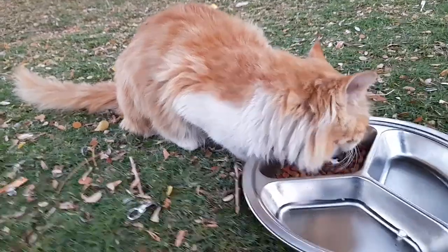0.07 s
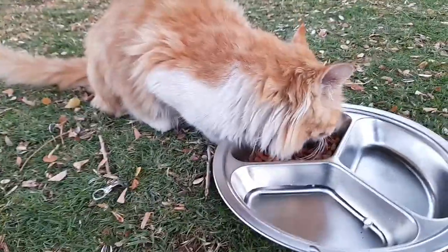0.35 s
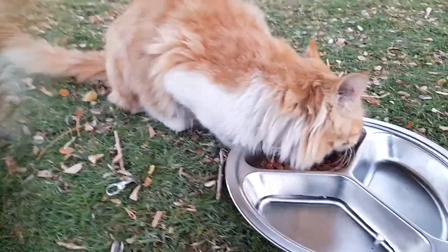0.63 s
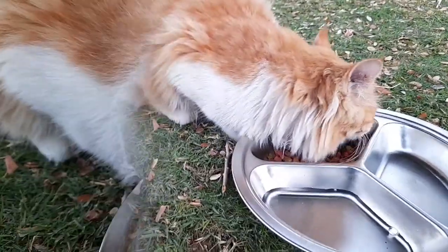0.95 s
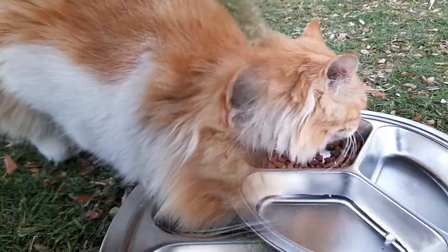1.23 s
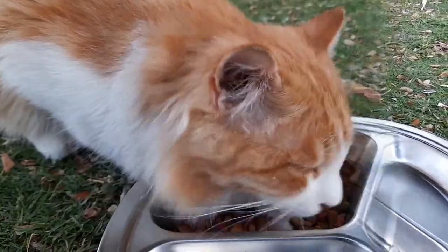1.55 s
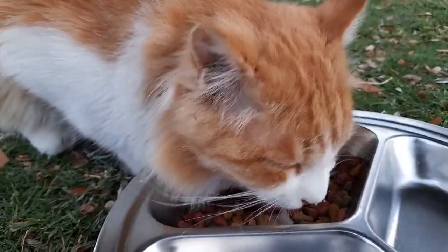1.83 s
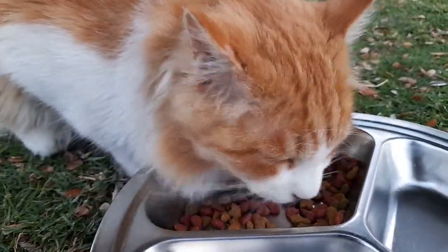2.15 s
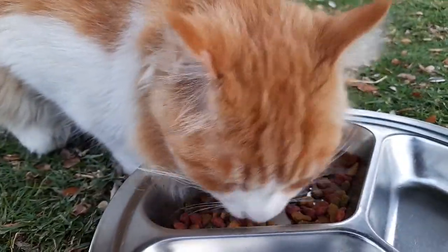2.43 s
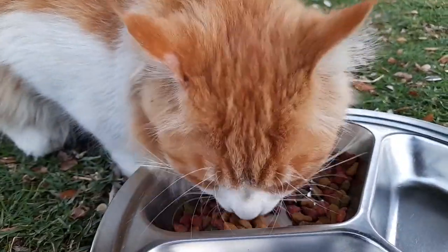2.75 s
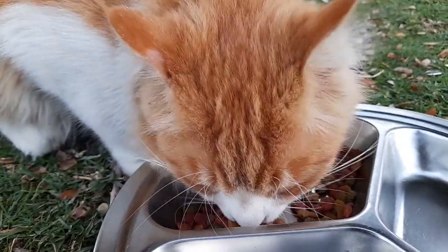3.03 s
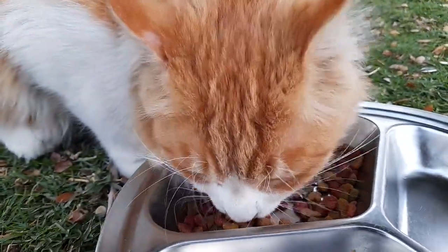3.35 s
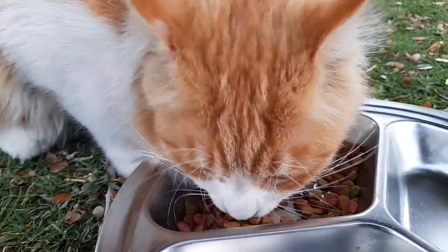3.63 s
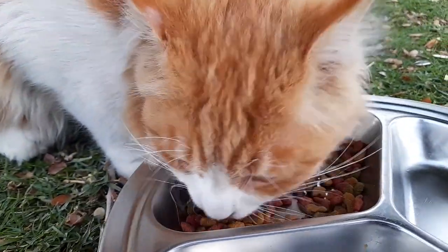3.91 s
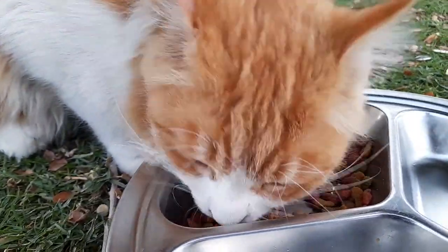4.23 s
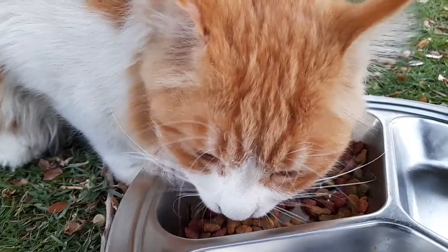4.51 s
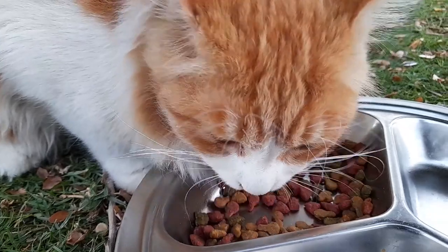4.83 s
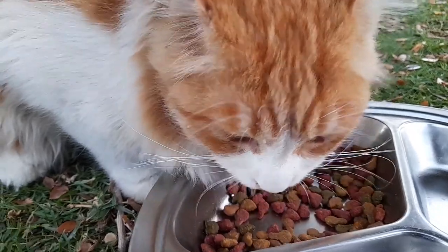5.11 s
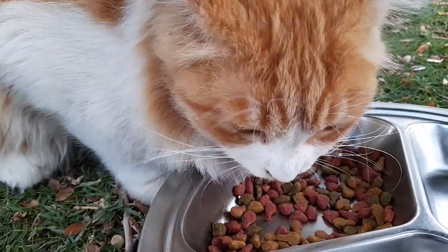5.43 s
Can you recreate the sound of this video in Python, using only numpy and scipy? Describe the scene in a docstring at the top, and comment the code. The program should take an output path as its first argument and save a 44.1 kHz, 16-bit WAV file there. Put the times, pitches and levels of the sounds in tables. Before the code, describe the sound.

Crisp crunches and light metallic clinks sound close to the microphone as a cat eats dry food from a steel tray outdoors. The opening rumble of far traffic, engine hum and grass hiss drops, and the eating turns sparse. Then the pellets rattle against the metal again, with a few soft bumps, before giving way to tiny wet licks and quiet chewing.

```python
"""A cat eats dry food from a steel tray on a lawn, heard from close above.
Over far traffic and an engine drone, its muzzle shoves pellets against the ringing steel and they
crack between its teeth. The louder opening background cross-fades into a quieter one by 1.6 s.
From 3.1 s a second bout of shoving rattles the tray and grinds the heap, with soft low thuds.
After 4.4 s the clinks give way to wet squeaks of the tongue and a few last quiet bites."""
import sys
import numpy as np
from scipy import signal
from scipy.fft import rfft, irfft
from scipy.io import wavfile
from scipy.ndimage import uniform_filter1d

SR = 44100
rng = np.random.default_rng(int(sys.argv[2]) if len(sys.argv) > 2 else 0)


def digitize_waveform(pressure):
    """Quantize a signal to 16-bit integers and store it at the path in sys.argv[1].

    Rows of a 2-D input are taken as channels; values are limited to [-1, 1].
    """
    field = np.atleast_2d(pressure).T
    bounded = np.clip(field, -1, 1)
    quanta = np.round(bounded * 32767).astype(np.int16)
    wavfile.write(sys.argv[1], SR, quanta)


N = 245544
TIME = np.arange(N) / SR

# pellets shoved against the tray: (time [s], relative body [dB], relative treble [dB], rattle time [s])
CLINKS = [(0.33, -44, -51, 0.0039), (0.4470, -38, -56, .008), (0.4694, -37.5, -47.5, 0.009),
          (0.524, -39.5, -46.5, .01), (0.7240, -41, -53, 0.012), (0.7620, -43, -53, 0.012),
          (0.865, -39.5, -58, 0.0057), (0.8876, -37.5, -42.5, 0.0053), (0.9290, -42.5, -57, 0.0075),
          (1.008, -41, -40.5, 0.0036), (1.0258, -39.5, -43, .012), (1.1561, -38.5, -44.5, 0.0039),
          (1.206, -46, -60, .01), (1.2890, -35.5, -49, 0.0068), (1.3, -44.5, -37.5, .009),
          (1.347, -43.5, -57, .008), (1.3662, -41.5, -44, 0.005), (1.442, -52, -58, .005),
          (2.556, -50, -72, 0.012), (2.663, -46, -65, 0.0096), (3.1193, -40, -50, 0.0042),
          (3.163, -40.5, -52, .01), (3.186, -42, -42.5, 0.0036), (3.247, -36.5, -45.5, 0.0084),
          (3.287, -38, -57, 0.003), (3.419, -46.5, -51.5, 0.016), (3.6547, -31.5, -43, .004),
          (3.7360, -41, -54, 0.0085), (3.7564, -34, -34, 0.011), (3.7973, -37.5, -42, 0.0091),
          (3.8219, -33.5, -37, 0.006), (3.926, -52, -59, .004), (3.9563, -45, -48.5, 0.0041),
          (4.0015, -41, -54, 0.012), (4.0340, -64, -57.5, 0.0077), (4.1370, -42.5, -53.5, 0.0066),
          (4.1591, -40.5, -43, 0.006), (4.231, -38.5, -44.5, 0.022), (4.275, -41.5, -48, 0.016),
          (4.301, -51, -56, 0.003), (4.3450, -35.5, -42, 0.0082)]
# pellets bitten through: (time [s], relative snap [dB], fragment pitch [Hz], mouth cavity level [dB])
CRACKS = [(0.0782, -33, 5900, -49), (0.3326, -35, 3870, -38), (0.3464, -34, 5300, -53),
          (0.4752, -31.5, 5170, -42), (0.6388, -36.5, 3770, -56), (0.8283, -19, 5980, -36),
          (1.0937, -30, 4220, -37.5), (1.1215, -35, 5300, -44), (2.0277, -43.5, 4580, -48),
          (3.29, -54, 5040, -35), (3.31, -41.5, 4300, -39.5), (4.155, -39, 6500, -39.5),
          (4.2245, -50, 4500, -41), (5.0998, -49.5, 5640, -62), (5.308, -42, 5400, -60),
          (5.4107, -49, 4940, -34), (5.4754, -53, 6400, -35), (5.5514, -48.5, 6000, -37.5)]


def tray(size=9000, body_db=-7, treble_db=2, tick_db=6, tick_s=0.0018, split_hz=7500, detune_hz=14):
    """Pellets rattle on the steel; every spot that they hit weights its modes differently."""
    run_up, hit_delay_s = 2600, .0035  # run-up: samples of scraping before the hit
    hz, t60, strength = steel_modes()
    spot = rng.standard_normal((len(CLINKS), 3, len(hz), 2)) @ np.array([1, 1j]) * strength
    # each channel hears its own mix of modes, plus a part common to both
    weights = (spot[:, :2] + 0.52 * spot[:, 2:]).reshape(-1, len(hz))
    # the contact itself is a dry tick on top of the ring
    modes = ring(hz, t60, size) * (1 + undb(tick_db) * np.exp(-TIME[:size] / tick_s))
    low_share = 1 / (1 + (hz / split_hz) ** 10)
    # the shifting load of food detunes the steel from knock to knock
    detune = np.exp(2j * np.pi * detune_hz * rng.standard_normal((len(CLINKS), 1, 1)) * TIME[:size])
    bodies = (((weights * low_share) @ modes).reshape(-1, 2, size) * detune).real
    trebles = (((weights * (1 - low_share)) @ modes).reshape(-1, 2, size) * detune).real
    mean_bright_db = np.mean([high_db - low_db for _, low_db, high_db, _ in CLINKS])
    out = np.zeros((2, N))
    for (s, low_db, high_db, rattle_s), body, treble in zip(CLINKS, bodies, trebles):
        hardness_db = 0.45 * (high_db - low_db - mean_bright_db)  # bright hits are the hard ones
        push = shove(run_up, rattle_s, hardness_db)
        body = peak_to(signal.fftconvolve(body, push, axes=1), low_db + body_db, size=180)
        treble = peak_to(signal.fftconvolve(treble, push, axes=1), high_db + treble_db, size=180)
        add(out, body + treble, s + hit_delay_s - run_up / SR)
    return out


def steel_modes(count=520, low_t60=0.21, high_t60=0.084, long_t60=.24, shimmer_db=-12):
    """Pitch, decay and gain of the tray's modes: a crowd damped by food and grass, some that ring on."""
    # long-ringing modes: (frequency [Hz], relative level [dB])
    ringing_modes = [(1632, 2), (2700, 6), (3273, 13.5), (5250, 5), (6546, 7), (10710, -3)]
    # colour of the damped crowd: (frequency [Hz], relative level [dB])
    crowd_colour = [(600, 7), (1100, 4.5), (1550, 9), (2150, 4.5), (2650, 10.5), (3500, 2), (4400, 5.5),
                    (6500, 2), (8500, -6), (12500, 0.5), (16000, -8.5)]
    crowd_hz = np.linspace(650, 16000, count) + rng.uniform(-60, 60, count)
    crowd_t60 = np.linspace(low_t60, high_t60, count)
    crowd_gain = colour_at(crowd_colour, crowd_hz)
    # every fourth escapes the damping: a weak, longer shimmer
    crowd_t60[::4] = long_t60
    crowd_gain[::4] *= undb(shimmer_db)
    mode_hz, mode_db = np.transpose(ringing_modes)
    mode_t60 = np.full(len(mode_hz), long_t60)
    return np.r_[crowd_hz, mode_hz], np.r_[crowd_t60, mode_t60], np.r_[crowd_gain, undb(mode_db)]


def shove(run_up, rattle_s, hardness_db, scrape_db=-26, rattle_db=-6.5):
    """Fine scraping builds up to the hit and pellets rattle on; a hard hit stands clear of both."""
    scrape = contacts(.016, follow_db=0, count=45)[:, run_up:0:-1]
    hit = contacts(rattle_s, follow_db=rattle_db - hardness_db, count=10)
    return np.c_[undb(scrape_db - hardness_db) * scrape, hit]


def contacts(mean_delay_s, follow_db, count):
    """A first sharp contact and a scatter of further ones that dies away."""
    push = np.zeros(4096)
    delay = rng.exponential(1, count)
    force = undb(follow_db) * rng.standard_normal(count) * np.exp(-delay / 2)
    onsets = np.minimum(delay * max(mean_delay_s, 1 / SR) * SR, len(push) - 1).astype(int)
    np.add.at(push, onsets, force)
    push[0] += 1
    return push[None]


def teeth(size=1200, snap_t60=0.0045, mouth_t60=0.015, snap_db=-3, splinter_db=-15):
    """A pellet splits in a few quick fractures: its fragments ping and the mouth cavity knocks."""
    # the right channel is further from the mouth, less so once the listener is in front of the cat
    side_lag_s, front_lag_s, in_front_from_s = 0.0005, 0.00026, 1.4
    mouth_hz, mouth_gains = np.array([544, 866, 1500, 2450]), np.array([1., 1.5, 2.8, -2.5])
    out = np.zeros((2, N))
    for s, db, hz, cavity_db in list(CRACKS) + nibbles():
        fragment = np.array([.9, 1., .6]) @ ring(hz * np.array([1, .66, 1.1]), snap_t60, size).imag
        jaw = np.exp(0.043 * rng.standard_normal())  # the mouth changes size from bite to bite
        cavity = mouth_gains @ ring(jaw * mouth_hz, mouth_t60, size).imag
        splinters = rng.standard_normal((2, size)) * np.exp(-TIME[:size] / 0.0039)
        fractures = contacts(.0012, follow_db=-15, count=5)
        snap = signal.fftconvolve(fragment + undb(splinter_db) * splinters, fractures, axes=1)
        knock = signal.fftconvolve(cavity[None], fractures, axes=1)
        left, right = peak_to(snap, db + snap_db, size=90) + peak_to(knock, cavity_db, size=90)
        add(out[0], left, s)
        add(out[1], right, s + (side_lag_s if s < in_front_from_s else front_lag_s))
    return out


def nibbles(count=24, gap_s=0.055, hz=5360, pitch_spread=0.22, spread_db=3, mouth_db=-4):
    """Small bits crack at an uneven pace, as further rows like those of CRACKS."""
    # spells of nibbling: (start [s], end [s], relative snap [dB])
    spells = [(0.097, 1.25, -47.5), (5.33, 5.381, -54)]
    cracks = []
    for start, end, db in spells:
        for k, (late, loud, pitch) in enumerate(rng.standard_normal((count, 3))):
            s = start + gap_s * (k + abs(late) / 2)
            snap_db = db + spread_db * loud
            if s < end:
                cracks.append((s, snap_db, hz * np.exp(pitch_spread * pitch), snap_db + mouth_db))
    return cracks


def crumbs(count=12, size=300, spread_s=.02, crumb_db=-13, t60=.0035):
    """Just after every knock and bite, pellets rub on each other in small dry ticks."""
    out = np.zeros((2, N))
    for s, db, *_ in list(CLINKS) + list(CRACKS):
        for lag, loud, *pitches in rng.standard_normal((count, 6)):
            hz = np.clip(5500 * np.exp(.55 * np.array(pitches)), 1500, 15000)
            phases = np.exp(2j * np.pi * rng.random((2, 4)))
            tick = (phases @ ring(hz, t60, size)).imag / 2
            onset_s = min(s + spread_s * (abs(lag) + .2), TIME[-1])
            add(out, tick * undb(min(db, -34) + crumb_db + 2 * loud), onset_s)
    return out


def grinding(contacts_per_s=600):
    """Swells of tiny dry contacts, coloured by the broad resonance of the heap of pellets."""
    # shifts of the heap: (middle [s], length [s], level [dB], resonance [Hz])
    shifts = [(0.544, 0.41, -49, 1910), (3.43, 0.059, -54.5, 2070), (3.825, 0.11, -54.5, 1570),
              (4.215, 0.52, -57, 1750)]
    out = np.zeros((2, N))
    grit = (rng.random((2, N)) < contacts_per_s / SR) * rng.uniform(-1.0, 1, (2, N))
    for s, length_s, db, hz in shifts:
        swell = np.exp(-2 * ((TIME - s) / length_s) ** 2)
        out += resonance(grit, hz, log_width=0.3) * swell * undb(db)
    return out


def squeaks(size=4096, slips_per_s=900, t60=0.0029, glide_hz_per_s=9000, waver=.035):
    """The wet tongue sticks and slips, ringing a small gap in the mouth whose pitch wavers and glides."""
    # squeaks of tongue and lips: (middle [s], length [s], level [dB], pitch [Hz])
    licks = [(4.486, .02, -62, 5150), (4.612, 0.019, -59, 4900), (5.066, 0.018, -65.5, 6000)]
    out = np.zeros((2, N))
    t = TIME[:size] - TIME[size // 2]
    decay = np.exp(-np.log(1000) / (t60 * SR))
    for s, length_s, db, hz in licks:
        swell = np.exp(-2 * (t / length_s) ** 2)
        slips = (rng.random(size) < slips_per_s / SR) * rng.standard_normal((2, size)) * swell
        pitch = hz * (1 + waver * walk(120)[:size]) + glide_hz_per_s * t
        carrier = np.exp(2j * np.pi * np.cumsum(pitch) / SR)
        squeak = (carrier * signal.lfilter([1], [1, -decay], slips / carrier)).imag  # gliding resonator
        add(out, peak_to(squeak, db, size=400), s + t[0])
    return out


def rasps(length_s=0.075, grain_db=3):
    """Tongue and fur brush the food: soft swells of grainy friction, each in one broad resonance."""
    # brushing strokes: (middle [s], level [dB], resonance [Hz])
    strokes = [(.2, -57, 13000), (.62, -58, 13000), (4.105, -62.5, 4260), (4.964, -64, 13000),
               (5.197, -67.5, 4000)]
    out = np.zeros((2, N))
    friction = rng.standard_normal((2, N)) * undb(grain_db * walk(440))
    for s, db, hz in strokes:
        swell = np.exp(-np.pi * ((TIME - s) / length_s) ** 2)
        out += resonance(friction, hz, log_width=0.24) * swell * undb(db)
    return out


def thuds(hz=72, size=2200):
    """A few smooth cycles of centred bass, as of the tray rocking on the turf."""
    # soft low bumps: (time [s], level [dB])
    bumps = [(1.29, -32.5), (3.117, -28.5), (3.673, -35), (4.576, -31), (5.377, -30.5)]
    out = np.zeros((2, N))
    for s, db in bumps:
        bass = np.sin(2 * np.pi * (hz * TIME[:size] + rng.random()))
        add(out, undb(db) * np.hanning(size) * bass, s - size / SR / 4)
    return out


def engine(turn_hz=35.93, wander=.003, smear=.3):
    """A far engine: its lowest order hums steadily, higher ones blur on their way through the air."""
    # harmonics: (multiple of the turning rate, relative level [dB])
    orders = [(2, 4), (3, 1), (5, -7.5), (7, -6.5), (8, -6.5), (9, -9.5)]
    # the drone's fade: (time [s], level [dB])
    fade = [(.9, -34.5), (1.33, -43), (1.6, -52.5)]
    phase = 2 * np.pi * np.cumsum(turn_hz * (1 + wander * walk(6.11))) / SR
    drone = sum(undb(db) * np.sin(k * phase + smear * (k - 2) * walk(30)) for k, db in orders)
    return unit(drone) * undb(curve(fade))


def traffic():
    """Far traffic: a deep rumble, and tyre roar that swells and recedes."""
    # spectrum of the rumble: (frequency [Hz], relative level [dB])
    rumble_colour = [(22, -45.5), (35, -14.5), (52, -7), (72, -1), (110, -2.5), (160, -9), (220, -13.5),
                     (300, -16.5), (420, -24), (650, -36.5), (1200, -61), (3000, -66.5)]
    # its course: (later level [dB], extra before the cross-fade [dB], drift [dB/s])
    rumble_levels = (-40.5, 5.9, 0.55)
    # swell of the tyres: (time [s], level before the low-pass [dB])
    tyre_swell = [(0, -62), (2.5, -54), (4.3, -62)]
    rumble = stereo_noise(rumble_colour) * undb(cross_fade(*rumble_levels))
    roar = stereo_noise([(450, -14.5), (800, -4.5), (1100, -2.5), (1700, -18.5)])
    tyres = roar * undb(curve(tyre_swell))
    return rumble + signal.sosfilt(signal.butter(2, 2000, fs=SR, output="sos"), tyres)


def murmur(waver_db=1.34):
    """A diffuse outdoor murmur in the low mids, its level gently wavering."""
    # spectrum of the murmur: (frequency [Hz], relative level [dB])
    colour = [(150, 1), (480, 9), (700, 3), (1400, -3.5), (2100, -5), (3000, -9.5), (5000, -30),
              (8500, -42), (13000, -25.5)]
    # its course: (later level [dB], extra before the cross-fade [dB], drift [dB/s])
    levels = (-53, 5, -0.42)
    return stereo_noise(colour) * undb(cross_fade(*levels) + waver_db * walk(11))


def grass(flicker_db=1):
    """Grass rustles in a fine, flickering hiss."""
    # spectrum of the rustle: (frequency [Hz], relative level [dB])
    colour = [(700, 8), (1400, 0), (2000, 13.5), (3000, 3.5), (4000, 6.5), (6000, -2.5), (7800, -12.5),
              (10000, -11.5), (13000, -9), (16000, -20)]
    # its course: (later level [dB], extra before the cross-fade [dB], drift [dB/s])
    levels = (-63.5, 9.8, -1.97)
    return stereo_noise(colour) * undb(cross_fade(*levels) + flicker_db * walk(90))


def cross_fade(later_db, extra_db, drift_db_per_s, from_s=0.58, to_s=1.59):
    """Level in dB of a background bed: a louder opening fades to a quieter level, drifting throughout."""
    opening = np.clip((to_s - TIME) / (to_s - from_s), 0, 1)
    return later_db + extra_db * opening + drift_db_per_s * (TIME - to_s)


def stereo_noise(colour):
    """Coloured noise from all around; long waves reach both channels nearly alike."""
    # stereo width of distant sound: (frequency [Hz], side relative to mid [dB])
    width = [(110, -15), (250, -10), (500, -4.5), (1000, -1)]
    mid, side = rng.standard_normal((2, N))
    return unit(tint(mid + tint(side, width) * np.array([[1], [-1]]), colour))


def resonance(x, hz, log_width):
    """A broad band of x around hz, at rms 1."""
    edges = np.clip(hz * np.exp([-log_width, log_width]), 100, .48 * SR)
    return unit(signal.sosfilt(signal.butter(2, edges, "band", fs=SR, output="sos"), x))


def ring(hz, t60, size):
    """Decaying complex oscillation of each mode, one row a mode."""
    return np.exp(np.outer(2j * np.pi * np.asarray(hz) - np.log(1000) / np.asarray(t60), TIME[:size]))


def tint(x, points, size=8192):
    """Causal filter with a (frequency [Hz], gain [dB]) response, built from its cepstrum."""
    cepstrum = irfft(np.log(colour_at(points, np.fft.rfftfreq(size, 1 / SR))))
    cepstrum[1:size // 2] *= 2
    cepstrum[size // 2 + 1:] = 0
    response = irfft(np.exp(rfft(cepstrum)))
    return signal.fftconvolve(np.atleast_2d(x), response[None], axes=1)[:, :N]


def colour_at(points, hz):
    """Gain of a (frequency [Hz], level [dB]) spectrum at the given frequencies."""
    f, db = np.transpose(points)
    return undb(np.interp(np.log(np.maximum(hz, 1)), np.log(f), db))


def walk(rate):
    """Smooth random motion: levels held 1 / rate s and slewed twice."""
    hold = int(SR / rate)
    steps = np.repeat(rng.standard_normal(N // hold + 1), hold)
    return unit(uniform_filter1d(uniform_filter1d(steps, hold), hold)[:N])


def curve(points):
    """Points (time [s], value) joined by straight lines."""
    return np.interp(TIME, *np.transpose(points))


def peak_to(x, db, size):
    """Set the level of the loudest stretch of size samples."""
    return x * undb(db) / np.sqrt(uniform_filter1d(np.mean(x ** 2, axis=0), size).max())


def add(out, x, s):
    """Mix a sound into out at time s."""
    i = max(int(s * SR), 0)
    out[..., i:i + x.shape[-1]] += x[..., :N - i]


def undb(db):
    """Decibels to gain."""
    return 10 ** (np.asarray(db) / 20)


def unit(x):
    """Scale to rms 1."""
    return x / np.sqrt(np.mean(x ** 2))


def scene():
    """The garden bed, and over it the cat at its tray."""
    garden = traffic() + murmur() + grass() + engine()
    return garden + thuds() + rasps() + squeaks() + grinding() + crumbs() + tray() + teeth()


def record(dry, top_hz=15800):
    """The right microphone port resonates in the presence range; a steep low-pass cuts the top."""
    # response of the right port: (frequency [Hz], gain [dB])
    right_port = [(60, 1.5), (300, 3), (600, 0.5), (1600, 4.5), (2800, 0.5), (4000, 6.5), (6100, 12),
                  (7400, 3), (10000, 0.5), (14000, 2)]
    ports = np.array([dry[0], tint(dry[1], right_port)[0]])
    return signal.sosfilt(signal.ellip(10, .2, 80, top_hz, fs=SR, output="sos"), ports)


dry = scene()
out = record(dry)
digitize_waveform(out)
```